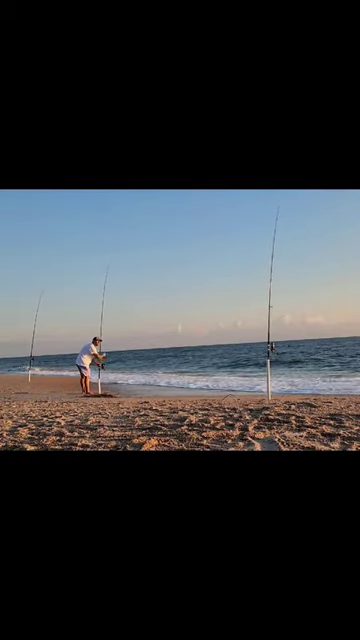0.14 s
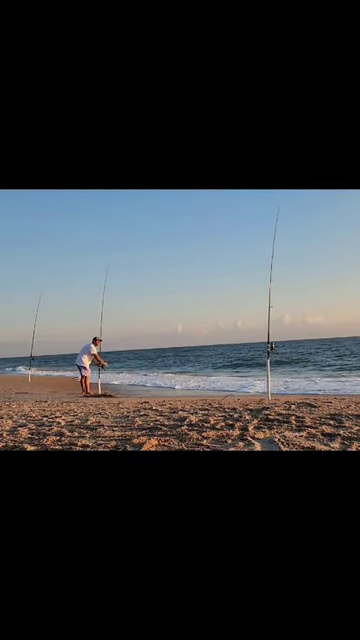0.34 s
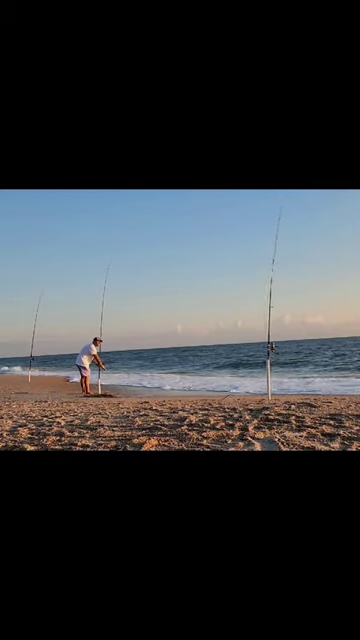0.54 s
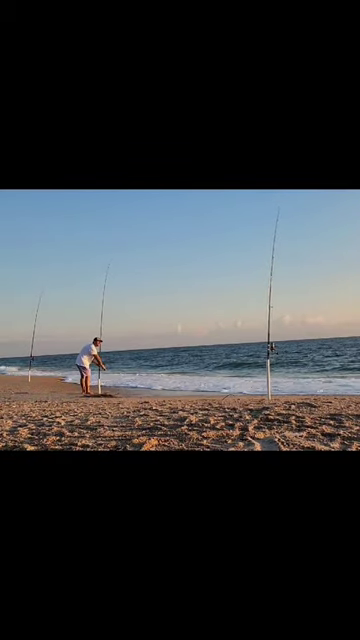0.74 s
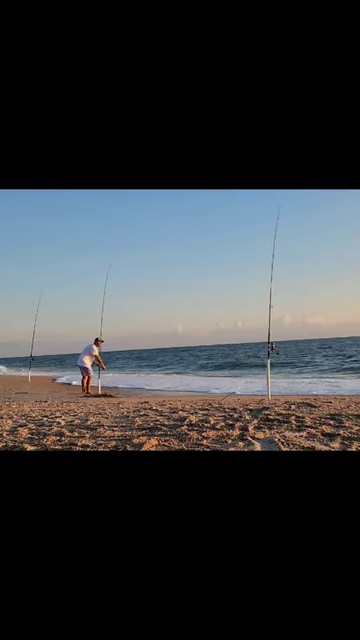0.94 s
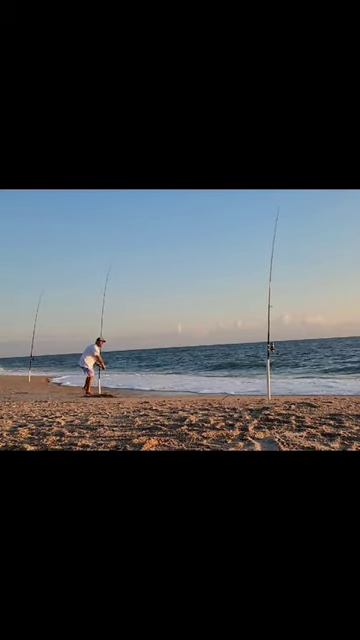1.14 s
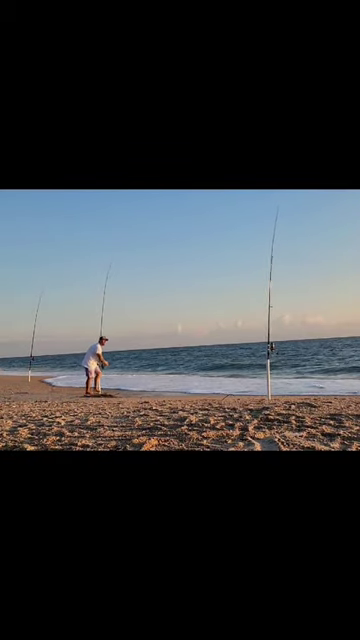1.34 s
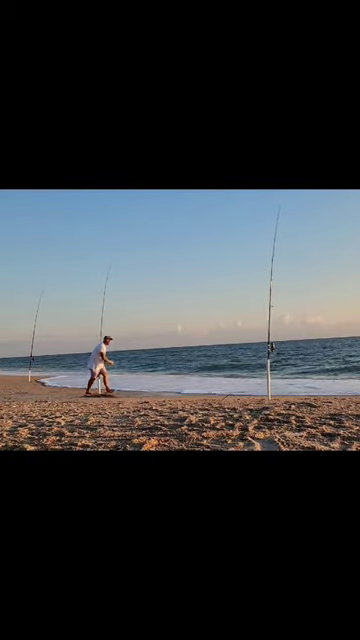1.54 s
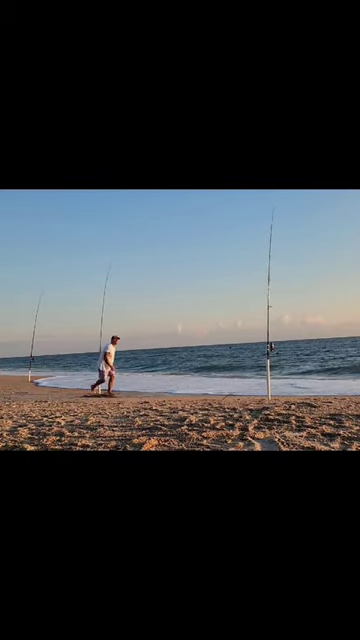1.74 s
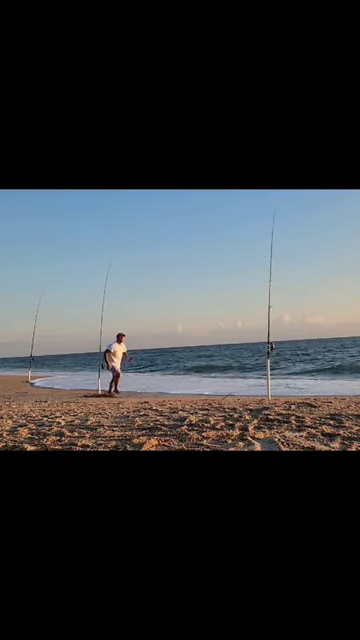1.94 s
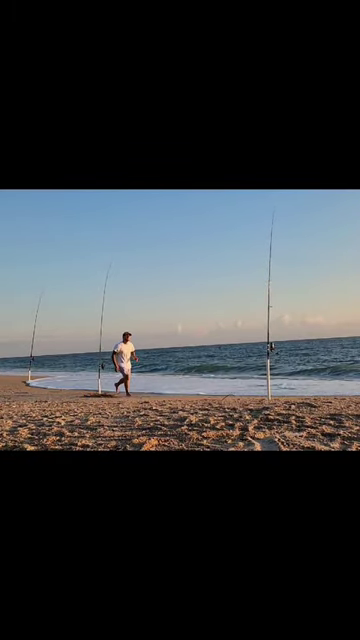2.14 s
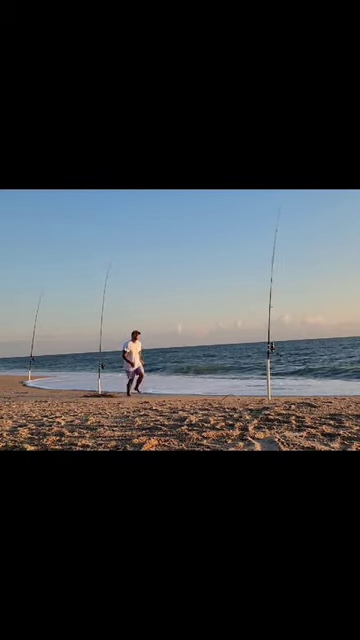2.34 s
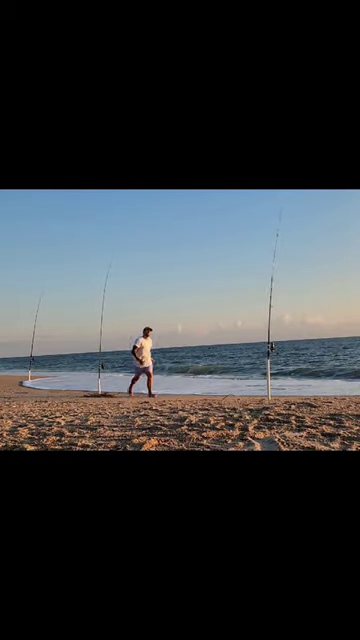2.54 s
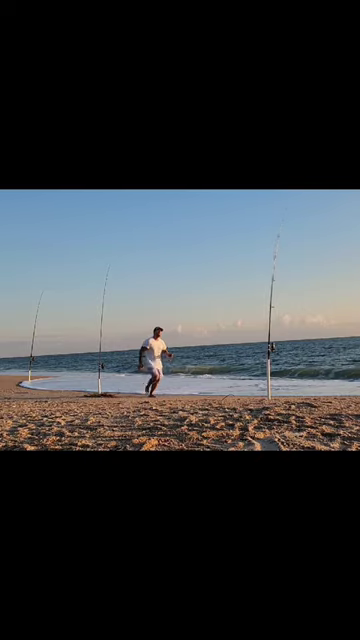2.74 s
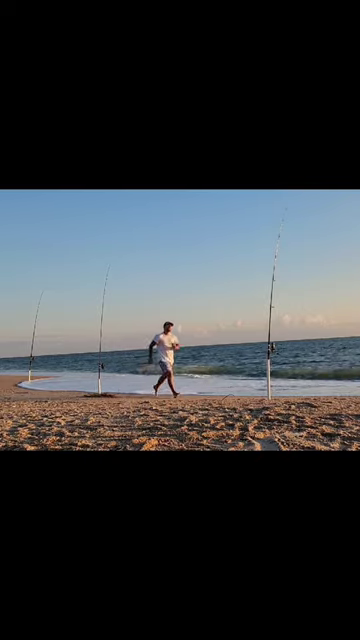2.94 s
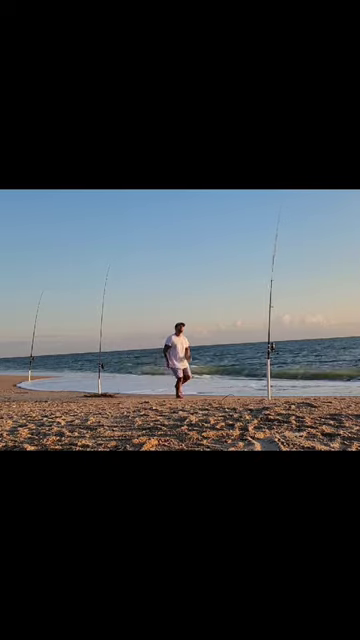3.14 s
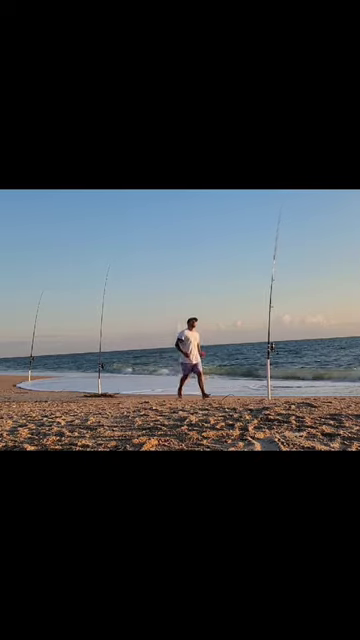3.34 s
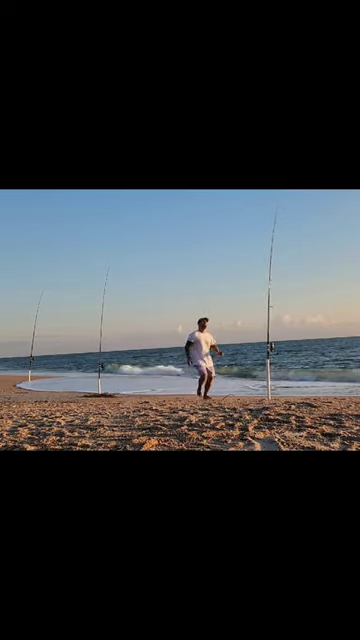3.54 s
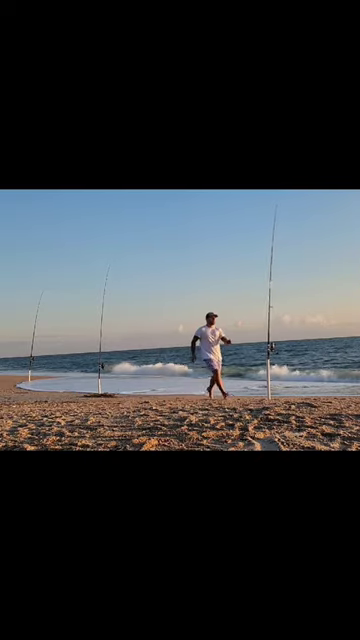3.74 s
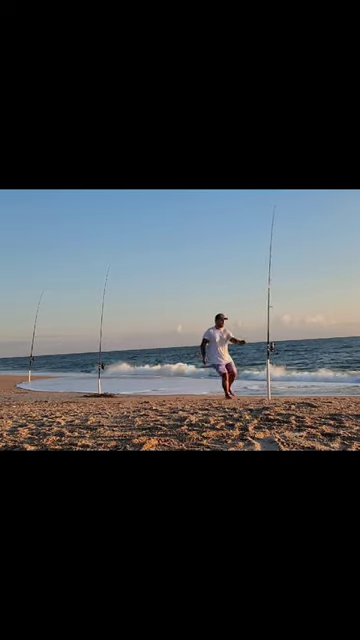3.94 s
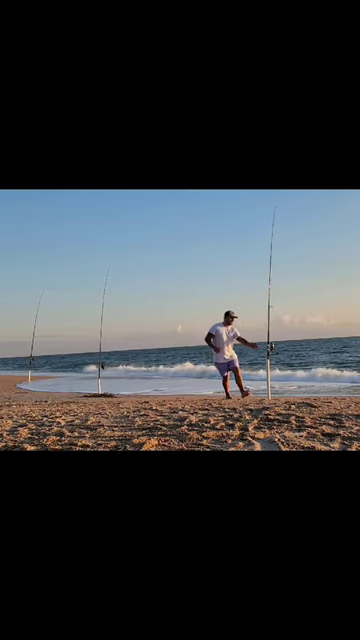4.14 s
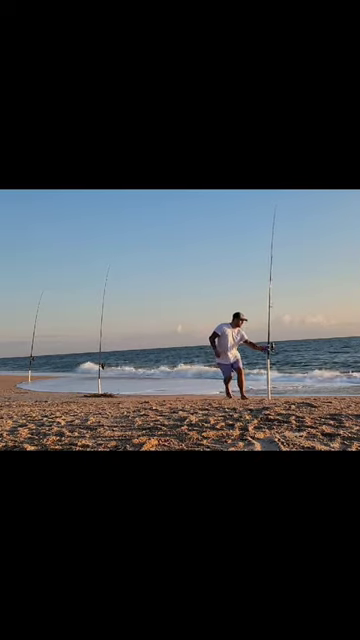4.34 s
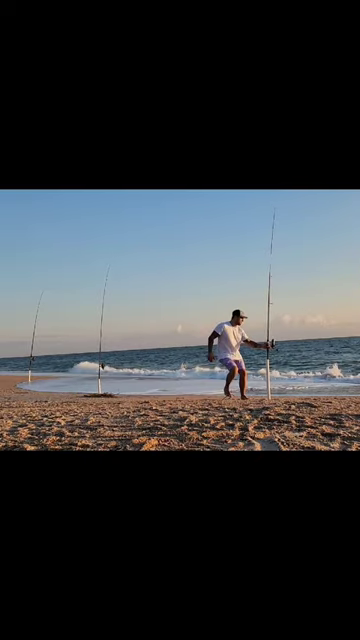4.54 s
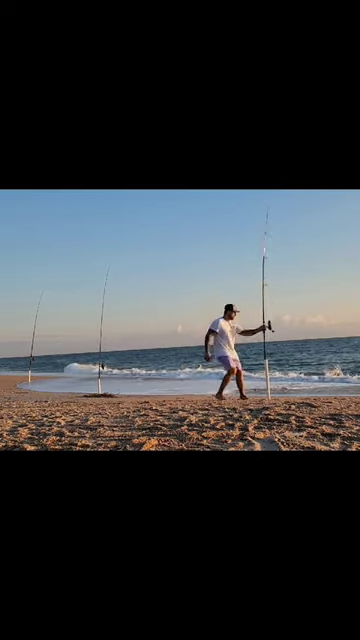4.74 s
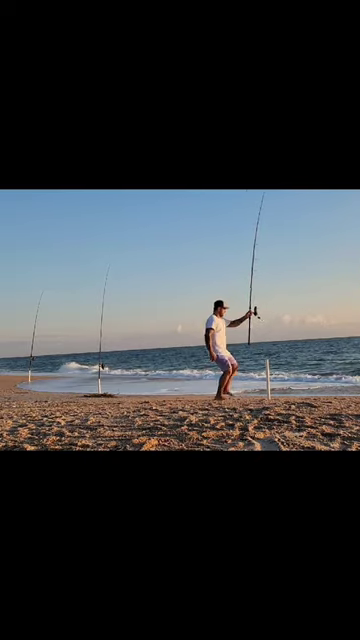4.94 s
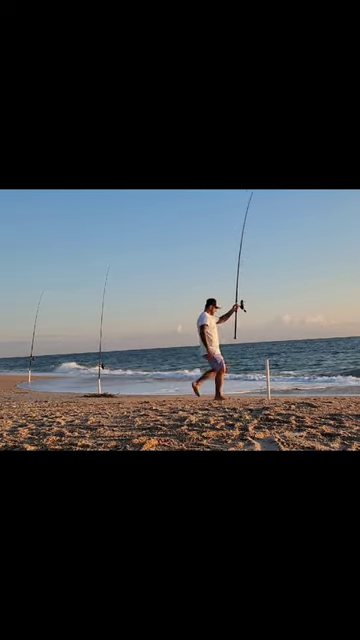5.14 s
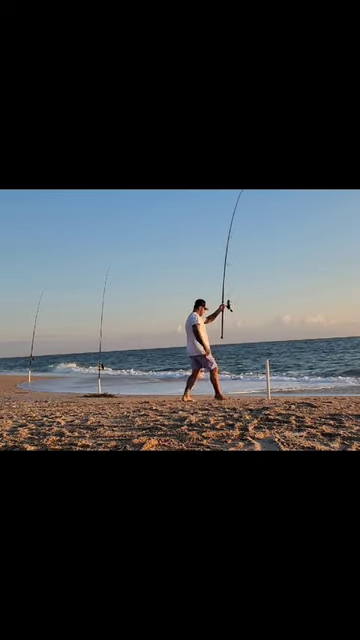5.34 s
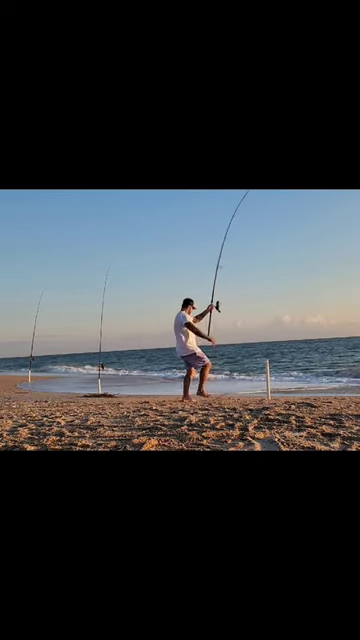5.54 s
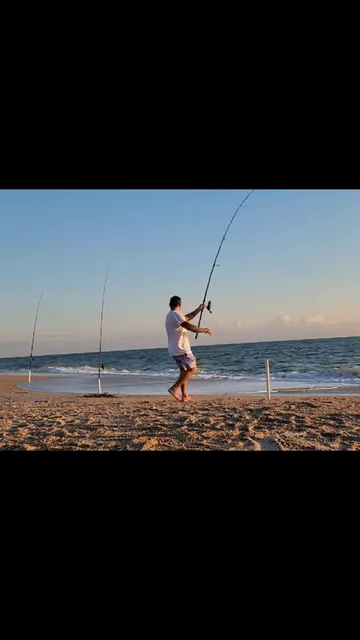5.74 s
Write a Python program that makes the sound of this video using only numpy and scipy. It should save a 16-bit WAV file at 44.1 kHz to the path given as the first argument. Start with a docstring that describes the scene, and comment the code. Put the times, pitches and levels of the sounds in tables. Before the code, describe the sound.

Wind rumbles and hums on a small microphone as surf drains down a sandy beach, a shore bird trills, then a louder wave crashes and foams.

```python
"""Surf on a sandy beach, heard by a small wind-blown microphone. Gusty noise rumbles throughout over a
wavering hollow hum. A wash of band-shaped noise drains away with two splashes, brief puffs of spray.
Near 2 s a shore bird trills in short falling tones, a few more puffs spit, and hissing foam runs up
the sand; the bird calls once more. From 3.5 s the next wave plunges: low patchy noise roars with
slams inside it, lumpy mid-pitched noise tumbles above, and the foam hisses on to the end."""
import sys
import numpy as np
from scipy import signal
from scipy.fft import rfft, irfft
from scipy.io import wavfile
from scipy.ndimage import uniform_filter1d

SR = 44100
rng = np.random.default_rng(int(sys.argv[2]) if len(sys.argv) > 2 else 0)


def int16_out(signal):
    """Quantize to a 16-bit WAV file."""
    q = np.round(np.clip(np.atleast_2d(signal).T, -1, 1) * 32767)
    wavfile.write(sys.argv[1], SR, q.astype(np.int16))


N = 259749  # samples

# Source levels are set ahead of the microphone. Spectra give relative level per Hz; only their shape counts.
# the breaking wave: [t/s, roar level/dB, tumble level/dB]
BREAKER = [(0, -35, -51), (.25, -37, -47.5), (.8, -36.5, -54.5), (1.05, -33, -55.5), (1.8, -33, -59.5),
           (2.1, -37, -56.5), (2.8, -34, -64), (2.9, -39, -55), (3.3, -36, -53), (3.5, -33, -44),
           (3.62, -25.5, -43.5), (3.8, -25, -36), (4.2, -23.5, -41.5), (4.65, -26, -39.5),
           (5.05, -28.5, -43), (5.55, -29, -44.5), (5.89, -32.5, -50)]
# masses of water slamming down within the roar: [t/s, peak level/dB, width at half height/s]
SLAMS = [(0.064, -31.5, 0.046), (0.174, -29, .06), (0.659, -32, 0.024), (.9, -34, 0.082),
         (1.016, -28, 0.061), (3.61, -23, .04), (3.748, -21, 0.049), (4.076, -20, 0.06), (4.45, -22.5, .08),
         (4.613, -20.5, .025), (5.16, -25, 0.043), (5.586, -19.5, .03)]
# lumps thrown up by the tumbling crest: [t/s, peak level/dB, width at half height/s]
LUMPS = [(2.17, -58, .03), (3.524, -39.5, 0.044), (3.883, -36, 0.036), (4.812, -37, 0.065),
         (5.169, -41, 0.084), (5.508, -40, 0.076)]
# spectrum of the roar: [f/Hz, level/dB]
ROAR_SPECTRUM = [(50, -12), (100, 3), (160, 2.5), (260, -1), (400, -4), (700, -15.5), (1000, -17),
                 (1500, -30.5), (2100, -28), (2600, -31), (5000, -35.5), (14000, -46.5)]
# water running over sand: [t/s, slosh level/dB, swash level/dB, foam level/dB, finest fizz level/dB]
WASH = [(0, -44.5, -44.5, -48, -59), (.17, -42, -42.5, -46.5, -57), (.38, -51, -47.5, -48.5, -63),
        (.93, -55, -50.5, -53, -61), (1.18, -48, -51, -53, -61.5), (1.64, -48, -47.5, -53, -57.5),
        (1.98, -47, -45.5, -52.5, -60), (2.15, -42.5, -46, -49, -53), (2.42, -41, -44.5, -49.5, -51),
        (2.55, -37.5, -40.5, -46.5, -50.5), (2.69, -37, -40, -47, -49.5),
        (2.97, -41.5, -44.5, -47.5, -50.5), (3.07, -37.5, -43.5, -45.5, -48.5),
        (3.39, -40, -44, -45.5, -53.5), (3.67, -36, -36, -41, -49.5), (3.85, -34.5, -38, -44.5, -52),
        (4.23, -32, -34, -41, -47), (4.62, -37, -37, -42, -49), (4.95, -42, -40, -42, -53),
        (5.18, -40, -37.5, -40.5, -53), (5.46, -38.5, -40, -41.5, -49), (5.68, -40.5, -39, -39.5, -44.5),
        (5.89, -38, -43, -39, -45.5)]
# thin water sings higher than deep, churning water: [t/s, swash centre f/Hz]
SWASH_PITCH = [(0, 1721), (1.0, 1630), (1.9, 1720), (2.6, 1970), (3.3, 1940), (3.9, 1430), (4.9, 1550),
               (5.5, 1580), (5.89, 1831)]
# pitches the swash favours: [f/Hz, full width/Hz, boost/dB]
SWASH_BANDS = [(1487, 160, 4), (2006, 170, 4)]
# spectrum of the larger foam bubbles bursting: [f/Hz, level/dB]
FOAM_SPECTRUM = [(900, -22), (1800, 0.5), (2600, -1), (3300, 2), (4200, -0.5), (5200, -2), (6300, -8.5),
                 (8000, -11), (10600, -22), (14200, -27)]
# spectrum of the finest bubbles bursting: [f/Hz, level/dB]
FIZZ_SPECTRUM = [(2500, -19), (5000, 0), (7300, -0.5), (9000, 0.5), (10600, -3.5), (11800, 1.5),
                 (13000, -0.5), (14200, -7)]
# splashes: [t/s, level/dB, length/s, blend from dull 0 to bright 1]
SPLASHES = [(0.141, -35, 0.005, 0.41), (.159, -43, .006, .1), (2.150, -48, .012, .9),
            (2.248, -50, .014, 0.87), (2.383, -47, .008, 1), (2.52, -55, .010, .7),
            (3.227, -40, 0.0077, .3), (5.165, -44, 0.017, .7)]
# spectrum of heavy drops: [f/Hz, level/dB]
DULL_SPLASH = [(1500, -8), (3200, -3), (6500, -4), (10000, -29)]
# spectrum of fine spray: [f/Hz, level/dB]
BRIGHT_SPLASH = [(4000, -16), (8500, 2), (14000, -3)]
# notes of the bird: [t/s, level/dB, starting f/Hz, fall as a share of f, length/s,
# second harmonic/dB, third harmonic/dB], harmonics relative to the fundamental
NOTES = [(2.117, -39, 2400, .03, .008, -20, -25), (2.139, -36, 2490, .04, 0.012, -8, -18),
         (2.161, -33.5, 2380, 0.053, 0.0091, -4, -15), (2.179, -36.5, 2400, .08, 0.012, -6, -12),
         (2.197, -42, 2350, .04, 0.0047, -3, -20), (2.233, -39.5, 2360, 0.056, 0.024, -8, -8.5),
         (2.258, -39, 2200, 0.077, 0.016, -5, -22), (3.235, -45.5, 2570, 0.065, 0.007, 12.5, -2)]
# steady push of the wind: [t/s, rumble level/dB]
WIND = [(0, -36.5), (.8, -36), (1.3, -42.5), (1.7, -38), (2.4, -38.5), (3.0, -33), (3.55, -45), (4.0, -34),
        (4.5, -28.5), (5.0, -36), (5.4, -32), (5.89, -39)]
# gusts that thump the microphone: [t/s, peak level/dB, width at half height/s]
THUMPS = [(0.247, -24.5, 0.058), (0.517, -32, 0.18), (1.02, -26, 0.073), (1.94, -25.5, 0.13),
          (2.28, -28.5, 0.13), (2.516, -30, 0.038), (2.82, -38, .07), (3.715, -17, 0.062), (3.83, -21, .06),
          (4.035, -22, 0.036), (4.153, -24, 0.11), (4.506, -23.5, .1), (4.67, -23, 0.1),
          (4.807, -18, 0.079), (5.151, -21, 0.045), (5.25, -25, 0.087), (5.39, -19.5, .09),
          (5.543, -28, .1)]
# spectrum of the rumble: [f/Hz, level/dB]
RUMBLE_SPECTRUM = [(15, -33), (25, -16), (45, 1), (65, 6), (85, -0.5), (130, -4.5), (220, -15.5),
                   (400, -54)]
# swells of the hollow hum: [t/s, peak level/dB, width at half height/s]
HUM_SWELLS = [(.05, -29.5, 0.084), (0.177, -24.5, 0.12), (0.38, -25.5, 0.075), (.57, -30.5, 0.094),
              (0.754, -34.5, 0.08), (0.906, -22, 0.063), (1.035, -24, 0.15), (1.235, -24, 0.093),
              (1.41, -28, 0.048), (1.61, -25.5, .2), (1.77, -30, 0.13), (1.903, -24.5, 0.099),
              (2.706, -33.5, 0.28), (3.046, -27.5, .06), (3.145, -27.5, .08), (3.3, -28.5, 0.064),
              (3.447, -29, .12), (3.591, -22.5, 0.081), (3.667, -28, 0.064), (3.773, -24, 0.06),
              (3.893, -21, 0.12), (4.03, -25.5, 0.18), (4.189, -22, 0.16), (4.358, -29, .12),
              (4.585, -20.5, 0.066), (4.77, -22.5, 0.053), (4.939, -23, .07), (5.09, -26, 0.17),
              (5.251, -27, .05), (5.41, -27, 0.098), (5.555, -22.5, .1), (5.72, -31, 0.028),
              (5.846, -23, 0.045)]
# the hum holds near one pitch, then is pushed about from 4.4 s: [t/s, f/Hz]
HUM_PITCH = [(0, 98.83), (2.0, 99.2), (2.5, 97.5), (4.4, 98.9), (4.6, 95.9), (4.9, 108.2), (5.15, 106.1),
             (5.35, 100.6), (5.6, 93.1), (5.89, 97.5)]
# a fainter tone a fifth above the hum: [t/s, level/dB]
UPPER_HUM = [(0, -50), (.6, -44), (.8, -44), (1.4, -39), (2.0, -45.5), (2.35, -41), (2.6, -68), (5.89, -60)]
# resonances of the microphone's housing: [f/Hz, full width/Hz, boost/dB]
HOUSING = [(1370, 77, -1), (2030, 57, 1.5), (2250, 430, 0), (4870, 320, 1.5), (5190, 120, 0),
           (7230, 370, 3)]

# humps of noise: each width runs from the centre out to the -6 dB point
TUMBLE_HZ, TUMBLE_WIDTH_HZ = 1254, 450
SLOSH_HZ, SLOSH_WIDTH_HZ, SWASH_WIDTH_HZ = 576, 263, 540
# brightness of the roar: dB per octave, then dB per octave for each dB of tumble or slam
TILT_DB, TILT_PER_TUMBLE, TILT_PER_SLAM = -0.5, 0.26, -0.25
EVEN_GAP_DB = -14.5  # tumble level relative to the roar that leaves the tilt alone
HUM_REST_DB, HUM_WIDTH_HZ = -44.5, 6.14
UPPER_HZ, UPPER_WIDTH_HZ = 148.6, 2.3
HEADROOM = 0.51  # amplitude ceiling of the input stage
EDGE_HZ = 13920  # top of the recorder's band


def breaker():
    """Clouds of trapped air roar low, with slams inside; the crest tumbles in lumps above."""
    t = np.arange(N) / SR
    roar_db, tumble_db = columns(BREAKER, t)

    def roar_colour(hz, t):
        return shape(ROAR_SPECTRUM, hz) + tilt(t) * np.log2((hz + 60) / 400)

    def tumble_colour(hz, t):
        return band_db(hz, TUMBLE_HZ, TUMBLE_WIDTH_HZ)

    roar = rush(roar_colour, swelling(roar_db, SLAMS, t), size=1024,
                patchy_db=1.34, patch_hz=300, patch_s=0.08, flicker_db=0.84, flicker_s=0.039)
    tumble = rush(tumble_colour, swelling(tumble_db, LUMPS, t), size=512,
                  patchy_db=2.0, patch_hz=250, patch_s=0.04, flicker_db=1.5, flicker_s=0.04)
    return roar + tumble


def tilt(t):
    """Brightness of the roar: it rises as the tumble gains on the roar and falls while a slam sounds."""
    roar_db, tumble_db = columns(BREAKER, t)
    tumble_gain_db = tumble_db - roar_db - EVEN_GAP_DB
    slam_rise_db = swelling(roar_db, SLAMS, t) - roar_db
    return TILT_DB + TILT_PER_TUMBLE * tumble_gain_db + TILT_PER_SLAM * slam_rise_db


def wash():
    """Water sloshes low, bubbles of like size sing in one moving band, bursting foam hisses above."""
    slosh_db, swash_db, foam_db, fizz_db = columns(WASH, np.arange(N) / SR)

    def slosh_colour(hz, t):
        return band_db(hz, SLOSH_HZ, SLOSH_WIDTH_HZ)

    def swash_colour(hz, t):
        centre_hz = columns(SWASH_PITCH, t)[0]
        return band_db(hz, centre_hz, SWASH_WIDTH_HZ) + peaks_db(SWASH_BANDS, hz)

    slosh = rush(slosh_colour, slosh_db, size=1024,
                 patchy_db=1.0, patch_hz=147.2, patch_s=0.028, flicker_db=0.25, flicker_s=0.045)
    swash = rush(swash_colour, swash_db, size=512,
                 patchy_db=1.5, patch_hz=200, patch_s=0.04, flicker_db=0.3, flicker_s=0.02)
    # large and small bubbles burst from the same foam, so one patchy noise carries both
    both_db = 10 * np.log10(amp(2 * foam_db) + amp(2 * fizz_db))
    foam = rush(foam_colour, both_db, size=512,
                patchy_db=1.0, patch_hz=500, patch_s=0.035, flicker_db=0.65, flicker_s=0.057)
    return slosh + swash + foam


def foam_colour(hz, t):
    """Large and fine bubbles burst independently, so their powers add at each pitch."""
    foam_db, fizz_db = columns(WASH, t)[2:]
    foam_share = amp(2 * shape(FOAM_SPECTRUM, hz))  # doubled decibels turn gain into power
    fizz_share = amp(2 * shape(FIZZ_SPECTRUM, hz))
    foam_power = amp(2 * foam_db) * foam_share / foam_share.sum()
    fizz_power = amp(2 * fizz_db) * fizz_share / fizz_share.sum()
    return 10 * np.log10(foam_power + fizz_power)


def splashes():
    """Thrown water lands as a brief puff; fine spray is brighter than heavy drops."""
    dull, bright = spray_noise(DULL_SPLASH), spray_noise(BRIGHT_SPLASH)
    out = np.zeros(N)
    for s, db, length, fine in SPLASHES:
        u = np.arange(0, 5 * length, 1 / SR) / length
        spray = ((1 - fine) * dull + fine * bright)[round(s * SR):][:len(u)]
        puff = 2 * u * np.exp(1 - 2 * u)  # peaks at half a length, then dies away
        add(out, s, amp(db) * puff * spray)
    return out


def spray_noise(spectrum):
    """Many small impacts at once blur into a steady noise of one colour, at unit rms."""
    return rush(lambda hz, t: shape(spectrum, hz), 0, size=256,
                patchy_db=1.5, patch_hz=900, patch_s=0.01, flicker_db=1, flicker_s=0.003)


def bird():
    """Short falling notes with two overtones, hoarse from fast random changes of pitch and level."""
    out = np.zeros(N)
    waver, flutter = uniform_filter1d(rng.standard_normal((2, N)), 60, axis=1)
    for s, db, hz, fall, length, second_db, third_db in NOTES:
        u = np.linspace(0, 1, round(length * SR))
        here = slice(round(s * SR), round(s * SR) + len(u))
        pitch_hz = hz * (1 - fall * u ** 1.9 + 0.15 * waver[here])
        turn = 2 * np.pi * np.cumsum(pitch_hz) / SR
        note = np.sin(turn) + amp(second_db) * np.sin(2 * turn) + amp(third_db) * np.sin(3 * turn)
        envelope = np.sin(np.pi * u) ** 0.65
        add(out, s, amp(db + 6.3 * flutter[here]) * note * envelope)
    return out


def wind():
    """Turbulence thumps the diaphragm and blows across a hollow that hums near one pitch."""
    t = np.arange(N) / SR
    rumble_db = swelling(columns(WIND, t)[0], THUMPS, t)
    rumble = rush(lambda hz, t: shape(RUMBLE_SPECTRUM, hz), rumble_db, size=2048,
                  patchy_db=1.5, patch_hz=40, patch_s=0.06, flicker_db=1.5, flicker_s=0.057)
    hum_db = swelling(HUM_REST_DB, HUM_SWELLS, t)
    hum = amp(hum_db) * edge_tone(columns(HUM_PITCH, t)[0], HUM_WIDTH_HZ, steady=0.8)
    upper_db = columns(UPPER_HUM, t)[0]
    upper_hum = amp(upper_db) * edge_tone(UPPER_HZ, UPPER_WIDTH_HZ, steady=0.26)
    return rumble + hum + upper_hum


def edge_tone(hz, width_hz, steady):
    """A tone wavering like narrow noise, its strength partly evened as a self-sustained tone's is."""
    f = np.fft.fftfreq(N, 1 / SR)
    a, b = rng.standard_normal((2, N))
    waver = np.fft.ifft((a + 1j * b) / (1 + (2 * f / width_hz) ** 2))
    turn = np.exp(2j * np.pi * np.cumsum(hz * np.ones(N)) / SR)
    steadied = waver / (abs(waver) + 1e-12) ** steady  # 0 leaves the strength free, 1 holds it flat
    return evened((turn * steadied).real)


def rush(colour_db, level_db, size, patchy_db, patch_hz, patch_s, flicker_db, flicker_s):
    """Noise of a moving colour, with drifting patches and a flicker shared by all pitches."""
    hop = size // 4
    t = np.arange(N // hop + 5) * hop / SR
    hz = np.fft.rfftfreq(size, 1 / SR)[:, None]
    a, b, patches = rng.standard_normal((len(t), len(hz), 3)).T
    # smooth the patches across pitch, then patches and flicker along time
    patches = uniform_filter1d(patches, max(round(patch_hz * size / SR), 1), 0)
    patches = evened(uniform_filter1d(patches, max(round(patch_s * SR / hop), 1), 1))
    flicker = rng.standard_normal(len(t))
    flicker = evened(uniform_filter1d(flicker, max(round(flicker_s * SR / hop), 1)))
    colour = amp(colour_db(hz, t) + 0 * t)  # 0 * t spreads a fixed colour over all frames
    colour = colour / np.sqrt((colour ** 2).sum(0))  # colour alone leaves the power unchanged
    z = (a + 1j * b) * colour * amp(patchy_db * patches + flicker_db * flicker)
    noise = signal.istft(z, nperseg=size, noverlap=size - hop)[1][:N]
    return amp(level_db) * evened(noise)


def swelling(base_db, events, t):
    """Level in dB of a background with bell-shaped swells added in power."""
    height = sum(amp(db) * 2 ** -(2 * (t - s) / length) ** 2 for s, db, length in events)
    return 10 * np.log10(amp(base_db) ** 2 + height ** 2)


def band_db(hz, centre_hz, width_hz):
    """A steep-sided hump, 6 dB down one width either side of its centre."""
    return -20 * np.log10(1 + ((hz - centre_hz) / width_hz) ** 2)


def peaks_db(modes, hz):
    """Sums resonance humps in decibels, each at half its boost half a width from its centre."""
    return sum(db / (1 + (2 * (hz - f) / width) ** 2) for f, width, db in modes)


def shape(points, hz):
    """Reads a spectrum on a log-frequency axis."""
    f, db = np.transpose(points)
    return np.interp(np.log(hz + 1), np.log(f + 1), db)


def columns(rows, t):
    """Reads the control curves at times t."""
    s, *values = np.transpose(rows)
    return [np.interp(t, s, v) for v in values]


def amp(db):
    """Decibels to gain."""
    return 10 ** (np.asarray(db) / 20)


def evened(x):
    """Scales to unit rms."""
    return x / np.sqrt(np.mean(x ** 2) + 1e-20)


def add(mix, s, sound):
    """Mixes a sound in at time s."""
    part = mix[round(s * SR):][:len(sound)]
    part += sound[:len(part)]


def scene():
    """Wave, wash, splashes, bird and wind at one microphone."""
    return (breaker() + wash() + splashes() + bird() + wind())[None]


def record(dry):
    """The housing colours the sound, the input stage softens peaks; then the recorder's band limit."""
    hz = np.fft.rfftfreq(N, 1 / SR)
    coloured = irfft(rfft(dry) * amp(peaks_db(HOUSING, hz)), N)
    softened = HEADROOM * np.tanh(coloured / HEADROOM)  # the loudest thumps are rounded off
    lowpass = signal.firwin(1023, EDGE_HZ, window=("kaiser", 9), fs=SR)
    return signal.oaconvolve(softened, lowpass[None], "same")


dry = scene()
out = record(dry)
int16_out(out)
```